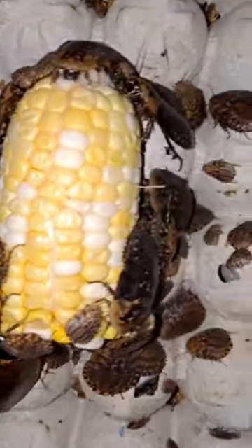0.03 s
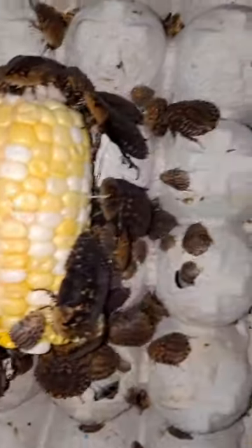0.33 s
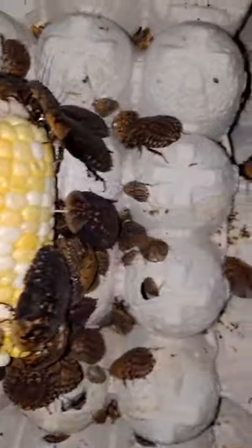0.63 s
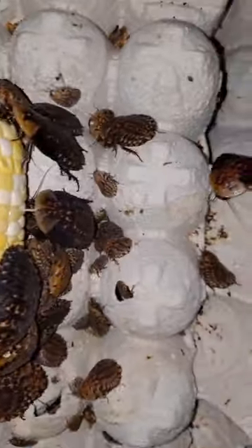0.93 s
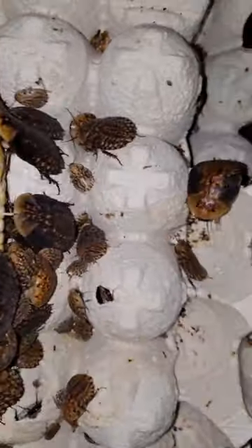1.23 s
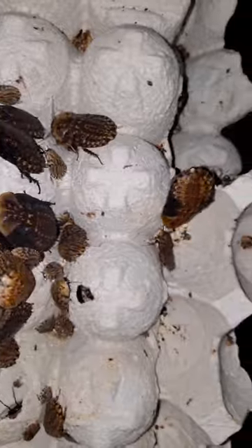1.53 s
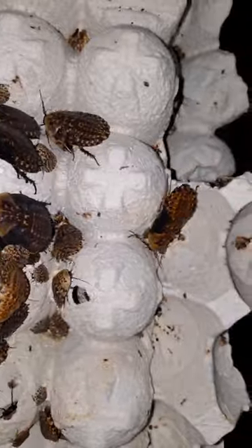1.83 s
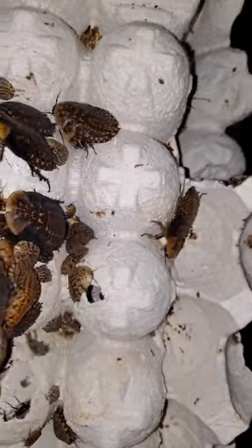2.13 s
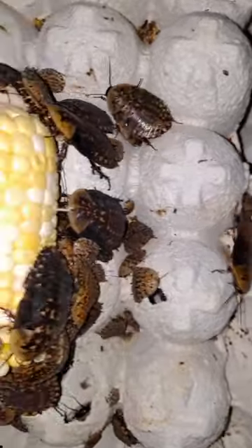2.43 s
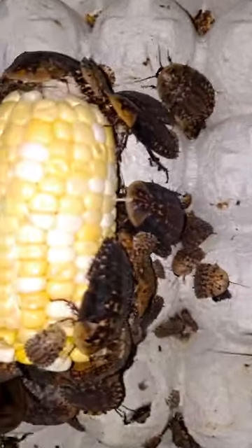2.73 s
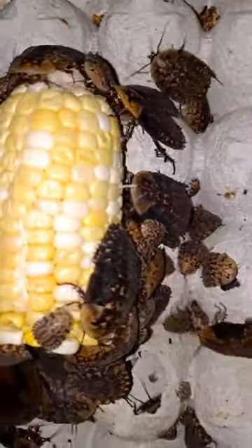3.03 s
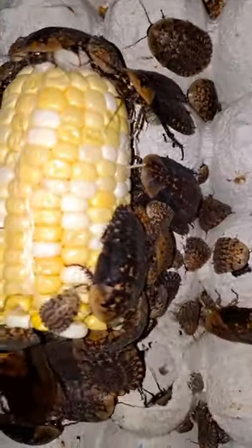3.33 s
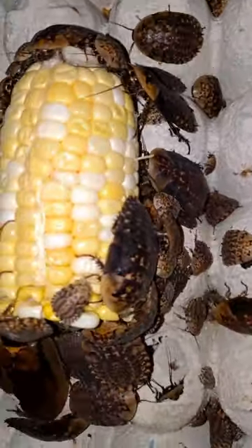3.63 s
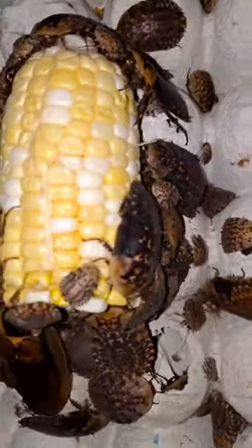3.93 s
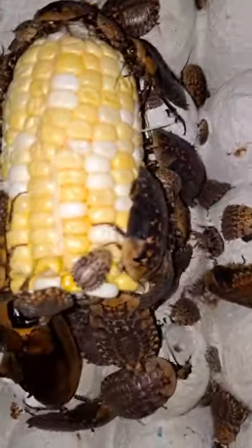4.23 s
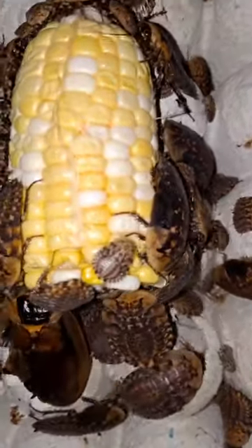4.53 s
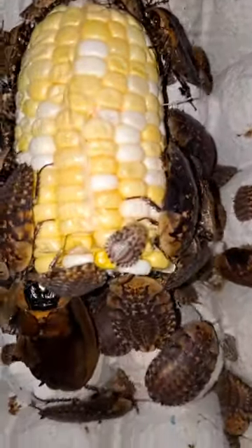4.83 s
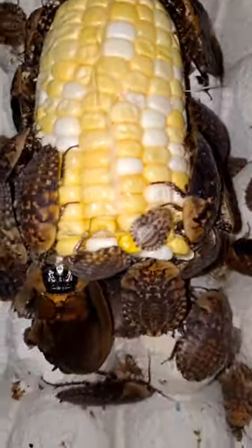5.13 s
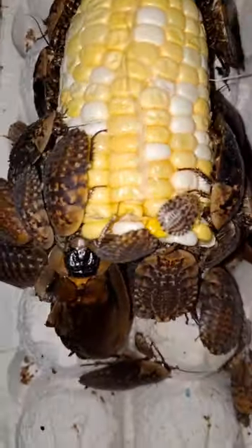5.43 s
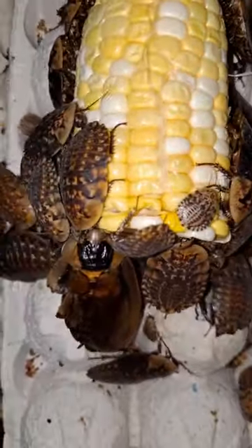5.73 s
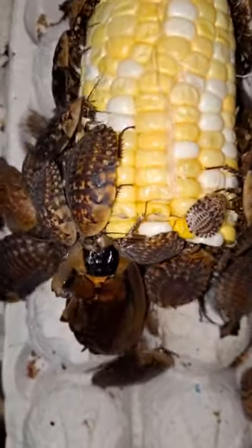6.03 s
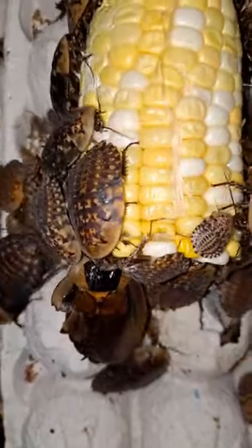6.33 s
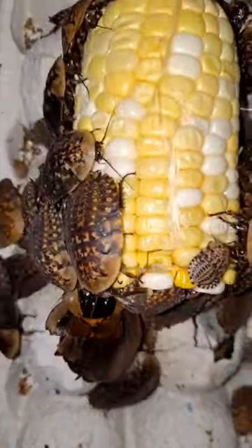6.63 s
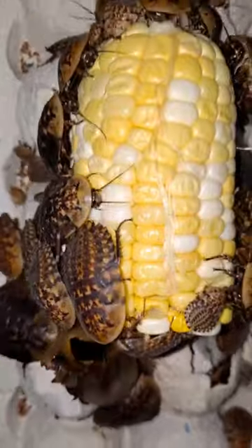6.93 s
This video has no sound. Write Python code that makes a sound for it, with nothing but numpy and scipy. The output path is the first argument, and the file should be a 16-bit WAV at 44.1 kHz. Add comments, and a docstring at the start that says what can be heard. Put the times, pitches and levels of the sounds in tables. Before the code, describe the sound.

Cockroaches crackle and rustle up close as they chew corn and scuttle over cardboard, with faint hiss and hum behind.

```python
"""A dense, dry crackle right at a hand-held microphone: cockroaches feeding on a corn cob and
scuttling over cardboard egg trays. Claws slip on fibres, bodies scrape the pulp board, and the nearest
bites and footfalls stand out as sharp snaps, all coloured by the tray's cups. Behind them are steady
hiss, room rumble and a motor hum that beats about once a second. The hand rubs the microphone
throughout and now and then bumps its case."""
import sys
import numpy as np
from scipy import signal
from scipy.fft import rfft, irfft
from scipy.io import wavfile

SR = 44100
rng = np.random.default_rng(int(sys.argv[2]) if len(sys.argv) > 2 else 0)


def waveform_to_disk(signal):
    """Save audio, clipped to [-1, 1], as 16-bit WAV at the path in sys.argv[1]."""
    frames = np.transpose(np.atleast_2d(signal))
    scaled = np.clip(frames, -1, 1) * 32767
    samples = np.round(scaled).astype(np.int16)
    wavfile.write(sys.argv[1], SR, samples)


N = 312669
TIME = np.arange(N) / SR


def from_db(db):
    """Decibels to gain."""
    return 10 ** (np.asarray(db) / 20)


def rms_one(x):
    """Scale to unit power."""
    return x / np.sqrt(np.mean(x ** 2) + 1e-20)


def in_time(rows):
    """Each column of an automation curve at every sample."""
    s, *columns = np.transpose(rows)
    return [np.interp(TIME, s, c) for c in columns]


def at_hz(points, hz):
    """Read an EQ curve on a log-frequency axis."""
    f, value = np.transpose(points)
    return np.interp(np.log(hz + 1), np.log(f), value)


def panned(pan_db):
    """Left and right gains with a mean power of one; pan is left minus right."""
    gains = from_db(np.atleast_1d(pan_db) * np.array([[.5], [-.5]]))
    return gains / np.sqrt(np.mean(gains ** 2, axis=0))


def drift(rate_hz):
    """Slow random modulation; rms 1."""
    hz = np.fft.rfftfreq(N, 1 / SR)
    return rms_one(irfft(rfft(rng.standard_normal(N)) / (1 + (hz / rate_hz) ** 2), N))


def band_noise(low_hz, high_hz):
    """Band-passed noise; rms 1."""
    band = signal.butter(2, [low_hz, high_hz], "band", fs=SR, output="sos")
    return rms_one(signal.sosfilt(band, rng.standard_normal(N)))


def add(out, s, sound):
    """Mix a sound in from time s on."""
    start = int(np.clip(round(s * SR), 0, N - 1))
    out[..., start:start + sound.shape[-1]] += sound[..., :N - start]


def port_colour(hz):
    """The microphone's sound port swallows one treble band and lifts the one above."""
    notch_db = -10 * np.exp(-.5 * ((hz - 10750) / 1000) ** 2)
    lift_db = 2 * np.exp(-.5 * ((hz - 14000) / 2000) ** 2)
    return from_db(notch_db + lift_db)


# Resonances of the egg tray's cups: (centre [Hz], width [octaves], boost [dB])
TRAY_CUPS = [(680, 0.11, 8.5), (2005, 0.026, 5), (3140, 0.062, 2.5), (4350, 0.064, 0.5),
             (7300, 0.051, -1.5)]


def claw_slip(length_s, pitch_hz, width_oct, pan_db, top_db=0, tray_db=-15, tray_t60=0.064, room_db=-33):
    """A claw slips on fibres: a noise burst in one broad resonance, then scatter between the cups."""
    size, direct_share, lag_s, crisp_hz = 4096, 0.6, 0.000421, 10000
    t, hz = np.arange(size) / SR, np.fft.rfftfreq(size, 1 / SR) + 1
    detune_oct = 0.04 * rng.standard_normal(len(TRAY_CUPS))  # no two cups ring quite alike
    cups = from_db(sum(db / (1 + ((np.log2(hz / centre) - off) / octaves) ** 2)
                       for (centre, octaves, db), off in zip(TRAY_CUPS, detune_oct)))
    crisp = from_db(top_db / (1 + (crisp_hz / hz) ** 14))  # a hard jaw adds top, soft pulp takes it away
    resonance = (1 + (np.log2(hz / pitch_hz) / width_oct) ** 2) ** -1.5
    noise = rfft(rng.standard_normal((3, size))) * resonance * cups * crisp * port_colour(hz)
    # the direct sound reaches one channel a little earlier; the scatter differs in each
    lead_s = lag_s * rng.uniform(-1.07, 1) * np.array([[.5], [-.5]])
    direct = irfft(noise[2] * np.exp(2j * np.pi * hz * lead_s))
    diffuse = irfft(noise[:2])
    decay = np.exp(-(t / length_s) ** 2)
    slip = (np.sqrt(direct_share) * direct + np.sqrt(1 - direct_share) * diffuse) * decay
    tails = from_db(tray_db - 60 * t / tray_t60) + from_db(room_db - 60 * t / 0.21)
    attack = 1 - np.exp(-(t / (0.58 * length_s)) ** 2)
    burst = (slip + diffuse * tails) * attack
    return burst / np.sqrt(2 * np.sum(burst ** 2, axis=1, keepdims=True)) * panned(pan_db)  # unit energy


def leg_strokes(per_s, accent_db, gap_s, length_s, pitch_hz, spread_oct, width_oct, pan_db,
                grain_db=2.5, spots=28, slips=7):
    """Each leg stroke sticks and slips at uneven intervals, on a spot with its own pitch; rms 1."""
    strokes = int(per_s * N / SR)
    # so many legs are at work that the strokes never pause for long
    start_s = (np.arange(strokes) + rng.uniform(0, 2, strokes)) * N / SR / strokes
    octave = np.log2(pitch_hz) + spread_oct * rng.uniform(-0.94, 1, strokes)
    force_db = accent_db * np.minimum(rng.exponential(1, (strokes, 1)), 2.5)
    delays_s = np.cumsum(rng.exponential(gap_s, (strokes, slips)), axis=1)
    at = ((start_s[:, None] + delays_s) * SR).astype(int) % N
    slip_db = force_db + grain_db * np.minimum(rng.standard_normal(at.shape), 2)
    impulses = from_db(slip_db) * rng.choice([-1, 1], at.shape)
    spot_octaves = np.linspace(octave.min(), octave.max(), spots)
    nearest = np.argmin(np.abs(octave[:, None] - spot_octaves), axis=1)
    out = np.zeros((2, N))
    for k, spot in enumerate(spot_octaves):
        clicks = np.bincount(at[nearest == k].ravel(), impulses[nearest == k].ravel(), N)
        grain = claw_slip(length_s * rng.uniform(0.65, 1.2), 2 ** spot, width_oct,
                          pan_db + rng.normal(0, 0.66))
        out += signal.oaconvolve(clicks[None], grain, axes=1)[:, :N]
    return rms_one(out)


# Fader ride for busy legs and jaws: (time [s], relative level [dB])
LEG_RIDE = [(0, -54), (.48, -58.5), (.72, -56), (1.3, -54.5), (1.47, -52.5), (1.6, -52.5), (2.1, -56.5),
            (2.56, -57.5), (2.66, -51.5), (2.96, -55.5), (3.12, -55), (3.93, -51.5), (4.02, -56),
            (4.6, -57), (5.2, -54), (5.3, -56.5), (6.3, -59.5), (6.44, -57), (6.68, -63.5), (7.0, -62)]
# Fader ride for bodies shuffling on the board: (time [s], relative level [dB])
BODY_RIDE = [(0, -63), (.2, -61), (.48, -63.5), (1.72, -58), (2.05, -62.5), (2.9, -60), (3.1, -60),
             (3.9, -59.5), (4.15, -63), (4.48, -54), (4.6, -60.5), (4.85, -56), (5.85, -58), (5.96, -60),
             (6.15, -56), (7.08, -62.5)]
# Fader ride for the bright scratch of spines: (time [s], relative level [dB])
SPINE_RIDE = [(0, -58), (.7, -60), (1.3, -55), (1.8, -57), (2.1, -58), (2.5, -60), (3.0, -57.5), (3.4, -59),
              (3.9, -55), (4.15, -60), (4.6, -57), (4.85, -57), (5.1, -54), (5.35, -62.5), (5.8, -55.5),
              (6.05, -55), (6.3, -59), (6.45, -54.5), (6.62, -56), (7.08, -62.5)]


def colony():
    """Legs and jaws crackle and tick in spurts; bodies scrape the board and their spines scratch it."""
    rides = in_time(LEG_RIDE) + in_time(BODY_RIDE) + in_time(SPINE_RIDE)
    leg_db, body_db, spine_db = [ride - ride.mean() for ride in rides]
    crackle = leg_strokes(per_s=220, accent_db=2.8, gap_s=.0022, length_s=0.0022, pitch_hz=3550,
                          spread_oct=0.66, width_oct=0.27, pan_db=-6.5)
    ticks = leg_strokes(per_s=130, accent_db=0.5, gap_s=.002, length_s=0.0022, pitch_hz=3780,
                        spread_oct=1.0, width_oct=1.04, pan_db=-1.5, spots=12, slips=1)
    scratch = leg_strokes(per_s=190, accent_db=2.5, gap_s=.005, length_s=0.0029, pitch_hz=8700,
                          spread_oct=0.61, width_oct=0.96, pan_db=-3, grain_db=2, spots=16)
    scrape = leg_strokes(per_s=220, accent_db=3.5, gap_s=.003, length_s=0.0035, pitch_hz=1194,
                         spread_oct=0.64, width_oct=1.0, pan_db=-10)
    legs = from_db(0.84 * leg_db) * (from_db(-60) * crackle + from_db(-62) * ticks)
    spines = from_db(-60 + spine_db) * scratch
    bodies = from_db(-61.5 + 0.99 * body_db) * scrape
    spurts = from_db(1.3 * drift(rate_hz=14))
    return spurts * (legs + bodies) + spines


# EQ of the room's rumble: (frequency [Hz], relative level [dB])
RUMBLE_EQ = [(15, -37), (25, -20), (54, -0.5), (108, 0), (194, -11), (249, -16.5), (317, -21), (600, -29),
             (780, -58), (1320, -120)]
# EQ of the hiss: (frequency [Hz], relative level [dB])
HISS_EQ = [(290, -23), (500, 5), (595, -2), (698, 5), (906, -9), (1360, 0.5), (3150, -4.5), (3440, -3),
           (4340, -4), (7980, -8), (9220, -8), (10700, -14), (13300, -28), (15100, -25), (16000, -2.5)]
# Stereo image of the bed: (frequency [Hz], left-right correlation [ratio, capped at 1])
BED_CORRELATION = [(60, 0.25), (200, 0.7), (700, 1.1), (1300, -1), (2400, 0.5), (15000, 0.5)]
# Lean of the bed: (frequency [Hz], pan [dB])
BED_PAN = [(30, -13), (90, -18), (200, -6), (800, -15), (1500, -3.5), (5000, -5), (9000, 13), (13000, -10),
           (15500, 18)]


def room_tone(eq):
    """A steady noise bed whose stereo width and lean change from band to band; rms 1."""
    hz = np.fft.rfftfreq(N, 1 / SR)
    alike = np.clip(at_hz(BED_CORRELATION, hz), -1, 1)
    mid, side = rfft(rng.standard_normal((2, N)))
    pair = np.sqrt(1 + alike) * mid + np.sqrt(1 - alike) * side * [[1], [-1]]
    return rms_one(irfft(pair * from_db(at_hz(eq, hz)) * panned(at_hz(BED_PAN, hz)), N))


def motor(hum_hz=119.6, beat_hz=0.934, beat_depth=1.51, strong_swell_s=3.492):
    """A motor hums at twice the mains rate and beats slowly, over a faint wavering octave."""
    beat_phase = 2 * np.pi * beat_hz * (TIME - strong_swell_s)
    phase = 2 * np.pi * hum_hz * TIME + 0.3 * drift(7.7)
    alternation_db = 1.2 * np.cos(beat_phase / 2)  # strong and weak swells in turn
    hum_db = -59.2 + alternation_db + 1.8 * drift(10.6)
    hum = from_db(hum_db) * (1 + beat_depth * np.cos(beat_phase)) * np.sin(phase)
    octave = from_db(-67.5 + 2.5 * drift(7.1)) * np.sin(2 * phase + drift(14))
    return np.sqrt(2) * (hum + octave) * panned(-11)


# Fader rides for the shifting grip, before trim: (time [s], rub level [dB], shudder level [dB])
GRIP_RIDE = [(0, -65, -53), (.35, -62.5, -51), (.8, -63.5, -75), (1.12, -64, -52), (1.44, -55.5, -54),
             (1.91, -69, -63), (2.39, -60.5, -58), (2.8, -66, -59), (3.34, -62, -52), (3.68, -58, -58),
             (4.2, -64, -74), (4.37, -60, -68), (4.44, -51, -62), (4.5, -58.5, -64), (4.66, -63, -57),
             (4.85, -57, -47.5), (5.3, -59, -54.5), (5.73, -61.5, -60), (6.1, -63.5, -66),
             (7.09, -64.5, -55)]


def hand_grip(rub_trim_db=-2, shudder_trim_db=-3.5):
    """Fingers shift on the microphone's case: an uneven rub over a deep shudder."""
    rub_db, shudder_db = in_time(GRIP_RIDE)
    friction = rms_one(band_noise(147, 424) * from_db(3.7 * drift(9.3)))
    rub = from_db(rub_db + rub_trim_db) * friction
    shudder = from_db(shudder_db + shudder_trim_db) * band_noise(41, 74.6)
    return rub * panned(-7) + shudder * panned(-13)


# A roach scurries (high) or drags its body over the board (low):
# (time [s], length [s], level before trim [dB], pitch [Hz], width [octaves])
SCURRY_CUES = [(0.037, 0.13, -60, 3100, 0.9), (0.236, .15, -56, 3700, 1.4),
               (0.516, 0.054, -55.5, 4220, 0.92), (0.864, 0.062, -58.5, 2740, 0.35),
               (1.197, 0.12, -56.5, 3020, 1.5), (1.568, 0.072, -56, 2500, 0.31),
               (3.13, 0.14, -57, 2630, 1.4), (3.291, .11, -55.5, 3360, 1.8),
               (3.595, 0.061, -56.5, 3620, 1.7), (3.823, 0.11, -57, 4800, 0.48),
               (4.102, 0.077, -60.5, 4170, 0.71), (4.385, 0.087, -57.5, 1800, 3.5),
               (4.781, 0.091, -51.5, 1600, 3), (5.013, 0.022, -65, 1290, 2.9),
               (5.158, 0.1, -53.5, 1900, 1.7), (5.391, 0.026, -51.5, 2342, 1.07),
               (5.448, 0.028, -51, 1600, 2.1), (5.878, 0.058, -63, 2690, 0.61),
               (6.132, 0.055, -55.5, 1307, 3.8), (6.395, 0.083, -52, 2300, 2.9),
               (6.927, 0.037, -56, 3238, 1.3), (6.992, 0.029, -54.5, 3870, 2.67)]


def scurries(trim_db=2.76, slips_per_s=165, spread_db=2.5, spread_oct=0.19):
    """A quick uneven run of slips on one part of the tray, each with a force and pitch of its own."""
    out = np.zeros((2, N))
    for s, length_s, db, pitch_hz, width_oct in SCURRY_CUES:
        slips = max(int(slips_per_s * length_s), 1)
        times = s + length_s * (np.arange(slips) + rng.uniform(0, 1, slips)) / slips
        forces = rms_one(from_db(spread_db * rng.standard_normal(slips)))
        gain = from_db(db + trim_db) * np.sqrt(2 * length_s * SR / slips)
        for at, force in zip(times, forces):
            slip_hz = pitch_hz * 2 ** (spread_oct * rng.standard_normal())
            add(out, at, gain * force * claw_slip(0.0035, slip_hz, width_oct, pan_db=-4, tray_db=-20))
    return out


# Close-up claw and jaw snaps:
# (time [s], energy [dB], pitch [Hz], width [octaves], crisp top [dB], length [s], pan [dB])
SNAP_CUES = [(0.0944, -14, 3500, 0.76, 10, 0.0031, -11), (0.2597, -12.2, 4650, 1.3, -4, 0.0015, -3),
             (0.345, -7.2, 7000, 1.7, -17, 0.0014, -5.5), (0.468, -29, 12000, 1, 0, 0.0018, 0),
             (0.5579, -16.5, 5000, 0.47, 19, 0.0039, -8.0), (0.6229, -25, 4050.0, 1.2, -3.0, 0.002, -4),
             (0.7704, -16.5, 3060.0, 1.7, -7, 0.0036, -4.0), (0.7829, -17.5, 2790, 2.6, -3, 0.0044, -4),
             (1.0065, -17, 5070, 0.73, 12, 0.0034, -3), (1.078, -21, 4490, 0.77, 8, 0.005, -8),
             (1.1927, -21, 2250.0, 1.24, 6, 0.0024, -9), (1.2199, -18, 4440.0, 2.7, -9, 0.0059, -4),
             (1.2875, -19.5, 2370.0, 2, -2.0, 0.0081, -3.0), (1.317, -23, 9170, 0.49, -10, 0.003, 1.0),
             (1.3838, -19, 5330.0, 4.6, -15, 0.0057, -6), (1.4048, -11, 8800, 0.6, -9, 0.0014, -6),
             (1.5481, -13.5, 5900, 1.2, -4, 0.0018, -7), (1.597, -18.5, 2540, 0.69, 8, 0.0078, -9),
             (1.677, -18, 3876, 2.86, -4, 0.0041, -1), (1.7615, -22, 14000, 2, 0, 0.0018, -3),
             (1.8525, -19.5, 720.0, 4.4, -3, 0.004, -8), (1.9949, -22.5, 1730.0, 0.97, 8, 0.0041, -10),
             (2.046, -22, 2370.0, 1.7, 5, 0.0064, -6.0), (2.1115, -20.5, 6060.0, 3.1, 1, 0.004, -8),
             (2.1282, -19.5, 2960.0, 2.3, -6, 0.0074, -8), (2.3044, -11, 2050, 0.7, -6, 0.0018, -3),
             (2.3674, -19.5, 2700.0, 1.5, -11, 0.0088, -8), (2.4388, -21, 4280, 0.41, 5.0, 0.0018, -6),
             (2.5405, -16.5, 3200, 1.7, -4, 0.0025, -8.0), (2.546, -22, 2900, 1.2, -2, 0.003, -7),
             (2.6145, -16, 3700, 0.54, 0, 0.0055, -8), (2.658, -16, 2800.0, 0.94, -8.0, 0.0047, -6),
             (2.7155, -16, 3950, 0.56, -17, 0.0011, -3), (2.7379, -14, 6030.0, 2.2, -3, 0.0051, -4.0),
             (2.8306, -18, 1510.0, 2.8, -10, 0.0058, -6), (2.967, -24.5, 11000, 1.5, 2, 0.0015, -2),
             (3.0349, -16.5, 3780, 1.3, -18, 0.016, -7), (3.0605, -19, 3340.0, 4.5, 2, 0.007, -3),
             (3.0996, -17, 2360.0, 1.47, 6, 0.0054, -5), (3.2483, -18, 3412, 0.9, 13, 0.0041, 0),
             (3.287, -16.5, 3600, 0.93, 4, 0.0057, -1), (3.3172, -21, 5390, 1.02, 14, 0.0079, 2),
             (3.386, -23.5, 1400, 0.82, 0, 0.0034, -6), (3.533, -18.5, 3000, 3, 2, 0.0025, -2),
             (3.5491, -18.5, 2850.0, 1.8, -9, 0.0061, -7), (3.6086, -20, 8200.0, 1.35, -3, 0.0051, 4),
             (3.6639, -17.5, 2510, 2.7, 1, 0.011, -2), (3.8694, -19.5, 5230.0, 0.55, 4, 0.0028, -9),
             (3.9652, -8.7, 5100, 1.6, -2, 0.0022, -6), (4.1043, -20, 4300, 0.71, -1, 0.0084, -3.0),
             (4.3095, -15.5, 1400, 1.56, -6, 0.0039, -7), (4.4612, -15.5, 1503, 4.1, 11, 0.0023, -10),
             (4.6532, -19, 1460, 0.58, 6, 0.0036, -16), (4.791, -17, 1480, 3.7, 7, 0.007, -14),
             (4.8206, -21, 1900.0, 1.4, 2, 0.0043, -9), (4.8688, -11.5, 15290, 4.6, 1, 0.0024, -4),
             (5.0094, -17.5, 1235, 2.4, 3, 0.012, -6), (5.2392, -23, 2481, 1.48, 9, 0.0033, -6),
             (5.39, -18.5, 2034, 1.1, -17, 0.0068, -8), (5.4149, -17.5, 4626, 4.8, -1, 0.0033, -2),
             (5.436, -14, 1169, 1.47, -4, 0.0061, -2), (5.461, -25, 1900, 1.7, -9, 0.0069, 0),
             (5.7075, -13.5, 1459, 2.4, 3, 0.0086, -9), (5.7853, -22, 3960, 0.83, 8, 0.0014, -7.0),
             (5.9762, -17.5, 6000, 3, 3, 0.0015, -7), (5.9984, -15, 1894, 2, 10, 0.0074, -10),
             (6.0687, -19.5, 1957, 2.3, 4, 0.0033, -6.0), (6.1576, -20, 1300.0, 1.57, 1.0, 0.0056, -6),
             (6.3437, -10.5, 5400, 1.5, -10, 0.0017, -7), (6.3502, -15.5, 1738, 1.02, 8, 0.006, -10),
             (6.414, -17, 2825, 1.92, -7, 0.013, -9), (6.5338, -20.5, 4390, 1.26, 1, 0.0022, -6),
             (6.6282, -24, 3430, 2.6, 1.0, 0.007, -4.0), (6.7594, -24, 5450.0, 0.86, 5, 0.0032, -5.0),
             (6.775, -9.5, 8330, 2.8, 10, 0.002, -4), (6.8046, -22, 3510.0, 1.9, 4, 0.0049, -5.0),
             (6.8238, -19.5, 6760.0, 0.86, -1, 0.0073, -5.0), (7.0238, -20.5, 2214, 3.26, 6, 0.0049, -3)]


def snaps(faint_per_s=9):
    """The nearest bites and footfalls stand out one by one; fainter ones fall at random between them."""
    chance = rng.standard_normal((int(faint_per_s * N / SR), 3))
    faint = [(rng.uniform(0, N / SR), -27 + 1.3 * force, 3600 * 2 ** (0.53 * spot),
              1.5, 0, 0.0033, -6 + 2 * side) for force, spot, side in chance]
    out = np.zeros((2, N))
    for s, db, pitch_hz, width_oct, top_db, length_s, pan_db in list(SNAP_CUES) + faint:
        snap = claw_slip(length_s, pitch_hz, width_oct, pan_db, top_db,
                         tray_db=-19, tray_t60=0.03, room_db=-32)
        add(out, s, from_db(db) * snap)
    return out


# Finger hits on the microphone: (time [s], strength [dB], contact time [s])
BUMP_CUES = [(1.225, -40.5, 0.0011), (3.666, -35.5, 0.0021), (4.3104, -29.5, 0.00014), (4.321, -36, 0.0023),
             (4.404, -30, 0.0026), (4.414, -25.5, 0.0046), (4.427, -31, 0.00223), (4.445, -34.5, 0.001),
             (4.464, -35, 0.0013), (4.7319, -26.5, 0.00063), (4.777, -33.5, 0.0016)]
# Ring of the microphone's case: (frequency [Hz], level [dB], decay by 60 dB [s])
CASE_MODES = [(103, -4.5, 0.066), (205, -7.5, 0.033), (346, 4, 0.0073), (638, -14, 0.058),
              (909, -3.5, 0.022), (1400, -14, 0.023), (1900, -25, 0.018)]


def finger_bumps(leak_hz=60):
    """Fingers knock the microphone's case; a longer contact rings only the low modes."""
    t, pushes = TIME[:SR // 5], np.zeros(N)
    for s, db, contact_s in BUMP_CUES:
        push = np.exp(-8 * (t / contact_s - 1) ** 2)
        add(pushes, s, from_db(db) * push / push.sum())
    ring = sum(from_db(db - 60 * t / t60) * np.sin(2 * np.pi * hz * t) for hz, db, t60 in CASE_MODES)
    # pressure leaks out of the case, so every push swings back
    ring = signal.sosfilt(signal.butter(2, leak_hz, "high", fs=SR, output="sos"), ring)
    return signal.oaconvolve(pushes, ring)[:N] * panned(-15)


def scene():
    """Insects in front, the room behind, the hand on the microphone."""
    room = from_db(-53) * room_tone(RUMBLE_EQ) + from_db(-60.5) * room_tone(HISS_EQ)
    insects = snaps() + scurries() + colony()
    return insects + room + motor() + hand_grip() + finger_bumps()


def record(dry):
    """A steep high cut at 15850 Hz on the whole mix."""
    return signal.sosfilt(signal.ellip(12, .1, 70, 15850, fs=SR, output="sos"), dry)


dry = scene()
out = record(dry)
waveform_to_disk(out)
```